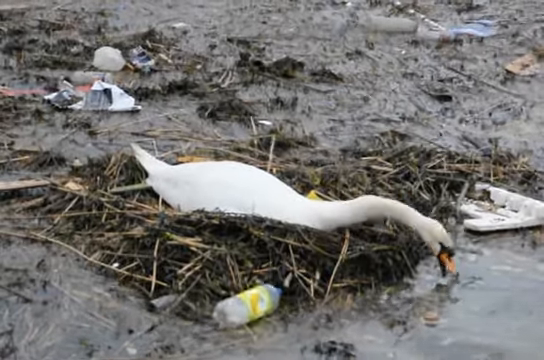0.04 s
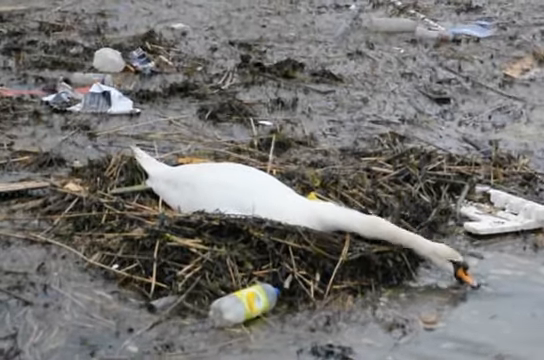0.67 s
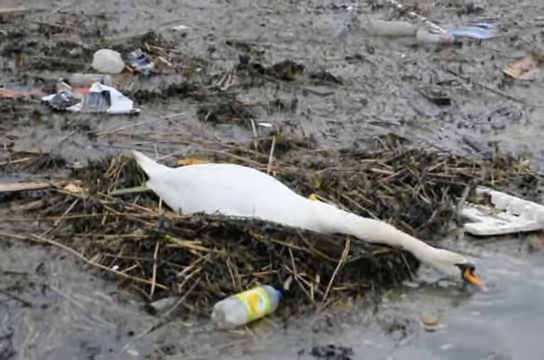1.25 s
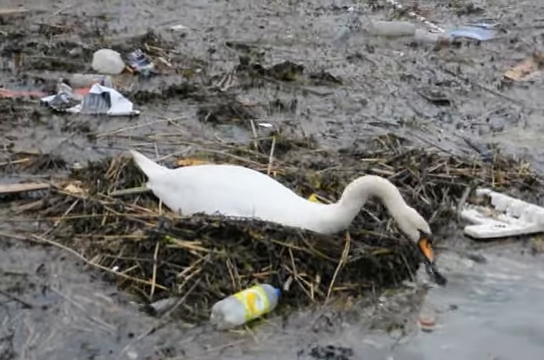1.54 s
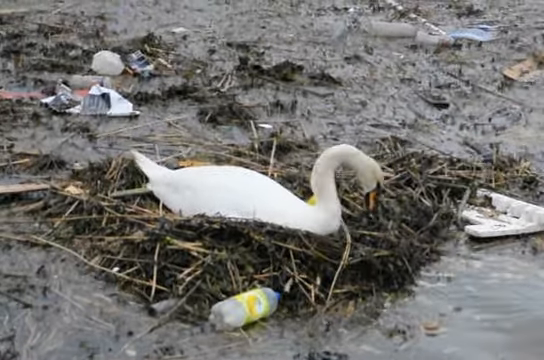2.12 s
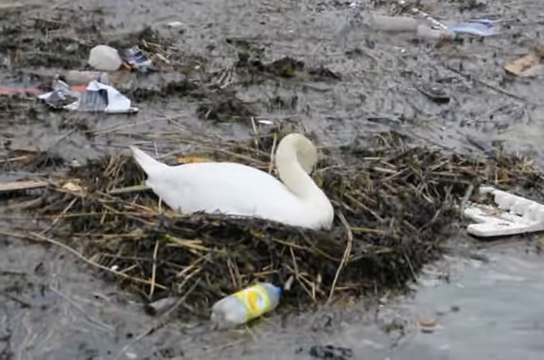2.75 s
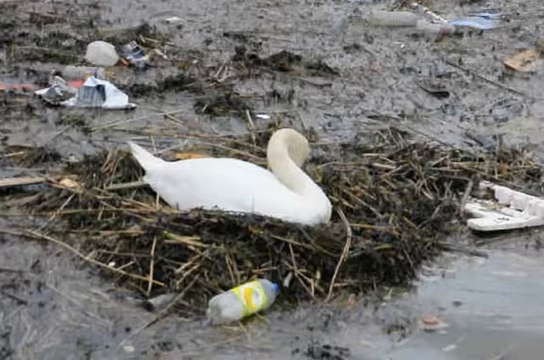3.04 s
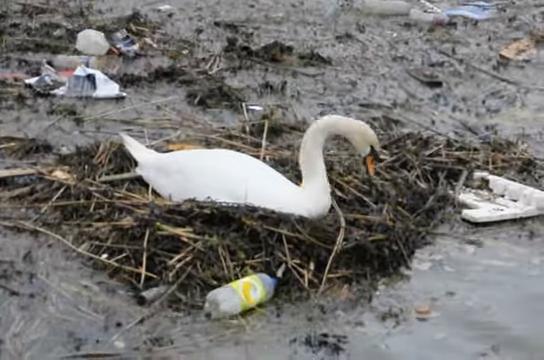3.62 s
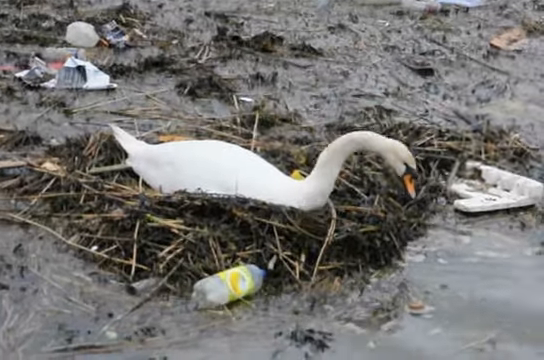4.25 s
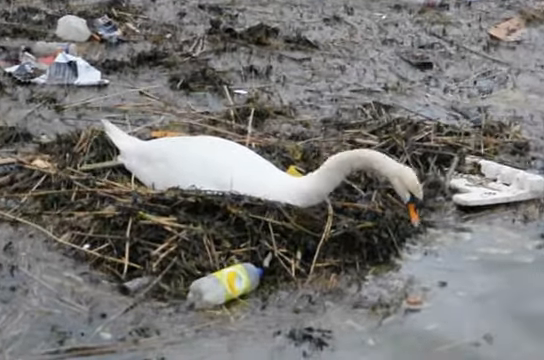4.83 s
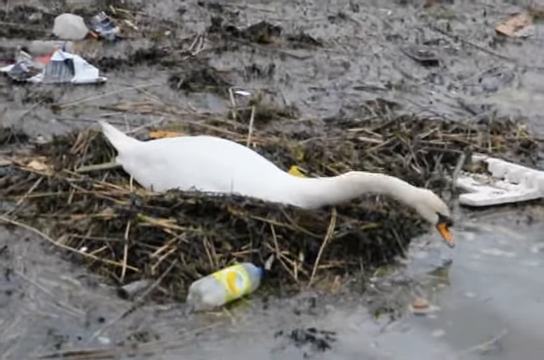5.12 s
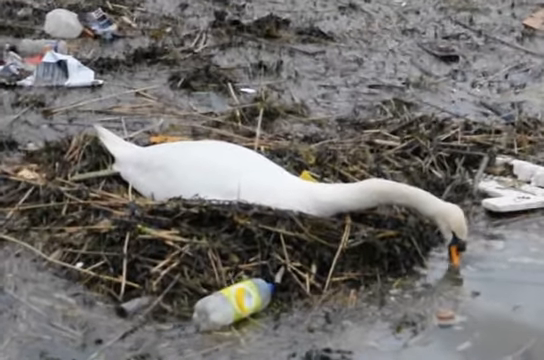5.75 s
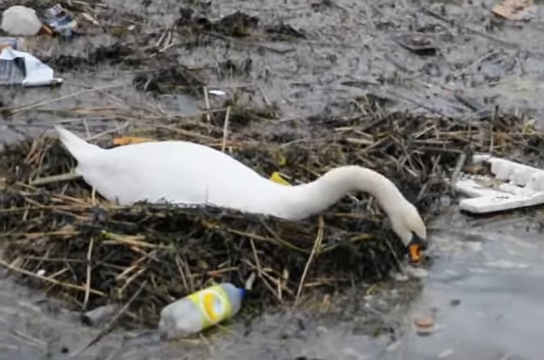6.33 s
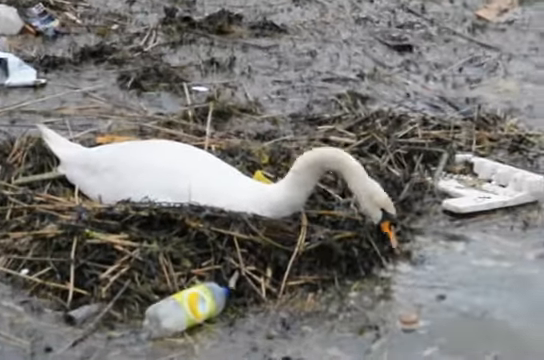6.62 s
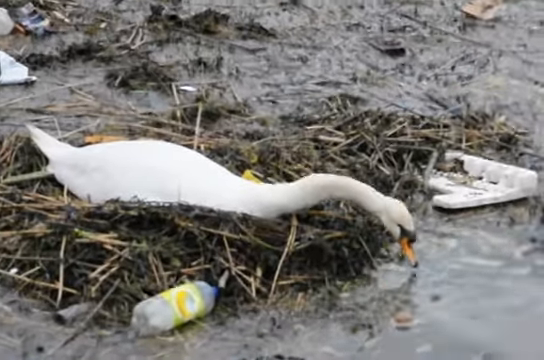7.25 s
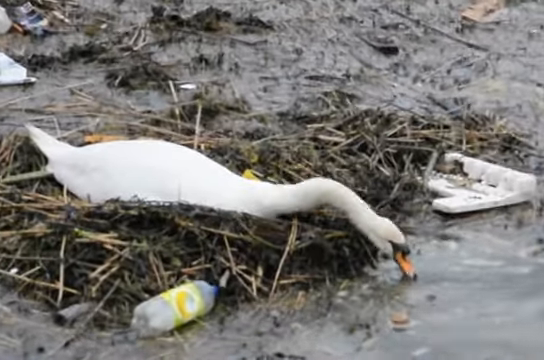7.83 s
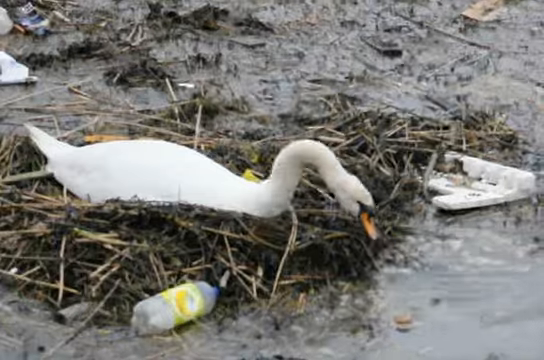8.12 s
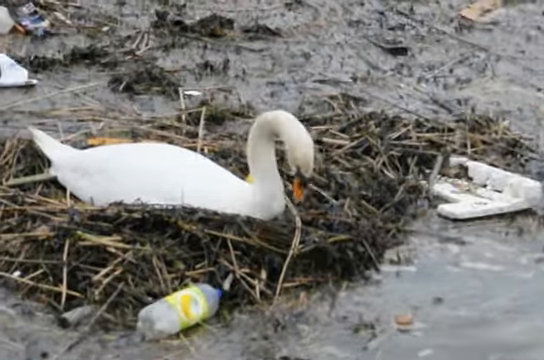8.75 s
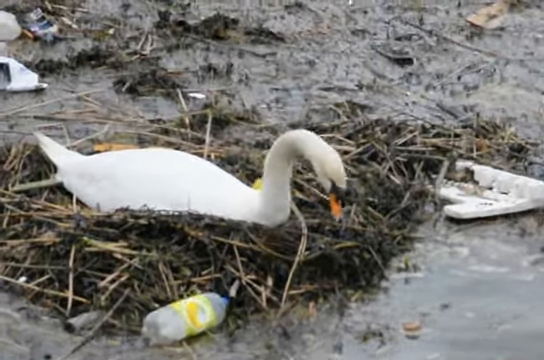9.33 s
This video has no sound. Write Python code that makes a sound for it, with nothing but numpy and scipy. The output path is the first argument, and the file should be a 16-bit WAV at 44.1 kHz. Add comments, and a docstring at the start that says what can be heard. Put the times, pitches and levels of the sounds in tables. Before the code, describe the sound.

An even, low wash of distant traffic runs throughout, heard from a muddy riverbank. A dabbling swan makes faint wet ticks at about 0.5 seconds and between 1.5 and 2 seconds, then three clearer ones between 5 and 5.7 seconds. Meanwhile a single car gradually approaches, its tyres roaring and hissing with a narrow singing tone above a faint engine hum. A small bird gives one thin, quiet peep near 3.9 seconds, and the tyres knock lightly over two seams at about 4.2 and 4.5 seconds. The car is loudest from roughly 6 to 8.5 seconds; its hum drops slightly in pitch as it passes, and the hiss then falls away. From about 7.7 seconds, gusts buffet the microphone with a low flutter and irregular thumps, strongest around 9 seconds and lasting until the end at about 9.5 seconds.

```python
"""A wash of far traffic lies over a muddy riverbank, and out of it one car draws near, passes and recedes.
Its tyres roar, hiss and sing on the asphalt above a faint engine hum that falls by the Doppler effect.
Early on, a swan dabbling at its nest makes small wet ticks; a small bird peeps once, and the tyres
knock over two seams. Towards the end, turbulent gusts buffet the microphone."""
import sys
import numpy as np
from scipy import signal
from scipy.fft import rfft, irfft, next_fast_len
from scipy.io import wavfile
from scipy.ndimage import uniform_filter1d, map_coordinates

SR = 44100
rng = np.random.default_rng(int(sys.argv[2]) if len(sys.argv) > 2 else 0)


def to_wav(s):
    """Save 16-bit WAV."""
    ch = np.atleast_2d(s).T  # columns
    pcm = np.round(np.clip(ch, -1, 1) * 32767)  # PCM
    wavfile.write(sys.argv[1], SR, pcm.astype(np.int16))


N = 418068
TIME = np.arange(N) / SR


def amp(db):
    """Amplitude ratio of a level in decibels."""
    return 10 ** (np.asarray(db) / 20)

def unit(x):
    """Normalisation to rms 1."""
    return x / np.sqrt(np.mean(x ** 2) + 1e-20)

def curve(rows):
    """Linear interpolation of (t, value) rows at every sample."""
    return np.interp(TIME, *np.transpose(rows))

def step(at_s, width_s):
    """A smooth transition from 0 to 1 around at_s."""
    return (1 + np.tanh((TIME - at_s) / width_s)) / 2

def wobble(rate):
    """Random modulation: a spline through rate knots a second."""
    knots = rng.standard_normal(int(N * rate / SR) + 4)
    return map_coordinates(knots, [TIME * rate])

def filtered(x, response):
    """Linear filtering: the spectrum of x times a frequency response."""
    size = next_fast_len(len(x) + 8192)
    return irfft(rfft(x, size) * response(np.fft.rfftfreq(size, 1 / SR)), size)[:len(x)]

def coloured(x, spectrum):
    """Spectral shaping by (f/Hz, level/dB) points on a log frequency axis."""
    f, db = np.transpose(spectrum)
    return filtered(x, lambda hz: amp(np.interp(np.log(hz + 1), np.log(f), db)))

def rush(spectrum, patchy_db):
    """Scintillation: noise of rms 1 with drifting patches of gain, as after crossing moving air."""
    spectrogram = signal.stft(rng.standard_normal(N), nperseg=1024)[2]
    patches = uniform_filter1d(rng.standard_normal(spectrogram.shape), size=7, axis=0)
    patches = unit(uniform_filter1d(patches, size=12, axis=1))
    noise = signal.istft(spectrogram * amp(patchy_db * patches), nperseg=1024)[1][:N]
    return unit(coloured(noise, spectrum))

def bursts(noise, rows):
    """Gaussian windowing: one burst of noise for each (t/s, level/dB, length/s)."""
    out = np.zeros(N)
    for at_s, db, length in rows:
        near = np.abs(TIME - at_s) < 2 * length
        window = np.exp(-2 * ((TIME[near] - at_s) / length) ** 2)
        puff = window * noise[near]
        out[near] += amp(db) * puff * np.linalg.norm(window) / np.linalg.norm(puff)
    return out


# Spectrum of distant roads: f/Hz, level/dB
TRAFFIC_SPECTRUM = [(20, -29.5), (62, -5.5), (100, -8.5), (160, -6), (270, -0.5), (360, -2), (620, -0.5),
                    (1000, -6.5), (1600, -10.5), (2400, -23.5), (3200, -28.5), (4500, -34), (5600, -45),
                    (7000, -57)]

def far_traffic():
    """Incoherent addition: distant roads merge into an even wash of noise."""
    return amp(-36.5 + 0.46 * wobble(3)) * rush(TRAFFIC_SPECTRUM, patchy_db=0.5)


PASS_S, ROAD_M, SPEED_M_PER_S, SOUND_M_PER_S = 7.7, 16.64, 11.96, 343

def distance():
    """Uniform motion on a straight road: metres to the car, least at PASS_S."""
    return np.hypot(ROAD_M, SPEED_M_PER_S * (TIME - PASS_S))

def passing(near_db, doubling_db, coming_db, going_db):
    """Gain under a loss per doubling of distance and screening before and after an open stretch."""
    screened_db = coming_db * (1 - step(5.85, width_s=0.24)) + going_db * step(8.39, width_s=0.09)
    return amp(near_db - doubling_db * np.log2(distance() / ROAD_M) - screened_db)


# Spectra of the parts of the tyre noise: f/Hz, level/dB
ROAR_COMING_SPECTRUM = [(300, -34.5), (570, -17.5), (700, -4), (930, -2.5), (1080, -3.5), (1270, -8.5),
                        (1520, -6.5), (1950, -10.5), (2500, -21), (3500, -37.5), (6000, -67)]
ROAR_GOING_SPECTRUM = [(300, -16.5), (520, -8), (780, -7), (950, 0.5), (1200, -4.5), (1500, -9),
                       (1950, -14.5), (2500, -21), (3500, -33), (6000, -63.5)]
HISS_SPECTRUM = [(900, -20.5), (2000, 7.5), (2700, 3.5), (3900, -2.5), (4700, -9), (5500, -20), (6200, -26),
                 (7200, -39)]
SIZZLE_SPECTRUM = [(2800, -30.5), (3700, 1), (4500, 1.5), (5500, -9.5), (6300, -14), (7200, -22.5)]
DRONE_SPECTRUM = [(25, -40), (70, -21), (120, -14.5), (200, -5), (280, 1), (365, -6), (460, -1.5),
                  (570, -9.5), (800, -8.5), (1500, -64.5)]
# Brief swells and dips of the tyre noise: t/s, half width/s, gain/dB
TYRE_SWELLS = [(4.95, 0.23, 1), (6.08, 0.51, 2), (7.36, 0.08, 0.9), (8.14, 0.1, -1.5), (8.4, 0.29, 3.5),
               (8.86, 0.096, 3.5)]

def tyres():
    """Rolling noise: roar, hiss, drone and, close by, sizzle; the roar changes colour in passing."""
    gone = step(8.04, width_s=0.31)
    roar = np.sqrt(1 - gone) * rush(ROAR_COMING_SPECTRUM, patchy_db=0.5)
    roar += np.sqrt(gone) * rush(ROAR_GOING_SPECTRUM, patchy_db=2.5)
    roar *= passing(near_db=-15.5, doubling_db=13, coming_db=-0.5, going_db=3.5)
    hiss = rush(HISS_SPECTRUM, patchy_db=0.95)
    hiss *= passing(near_db=-27, doubling_db=13, coming_db=4, going_db=11.5)
    sizzle = rush(SIZZLE_SPECTRUM, patchy_db=2.1)
    sizzle *= passing(near_db=-42.5, doubling_db=21.5, coming_db=2.5, going_db=10)
    drone = rush(DRONE_SPECTRUM, patchy_db=0.6)
    drone *= passing(near_db=-26.5, doubling_db=11, coming_db=0, going_db=-4)
    swell_db = sum(db * np.exp(-((TIME - at_s) / width) ** 2) for at_s, width, db in TYRE_SWELLS)
    road_db = 0.46 * wobble(14)  # uneven asphalt shakes all parts together
    return amp(road_db) * (amp(swell_db) * (roar + hiss + sizzle) + drone)


# Strength of the tread's song on the changing asphalt: t/s, gain/dB
SONG_GAIN = [(0, -15), (3.1, -3), (3.5, 2), (4.1, 2), (4.7, -2.5), (5.5, 1.5), (7.3, -2.5), (8.7, 4),
             (9.48, -1.5)]

def tread_song(centre_hz=921, half_width_hz=65):
    """Resonance: air in the tread grooves sings in one narrow band."""
    groove = filtered(rng.standard_normal(N), lambda hz: 1 / (1 + ((hz - centre_hz) / half_width_hz) ** 2))
    gain = passing(near_db=-27.5, doubling_db=5.5, coming_db=2.5, going_db=3)
    return gain * amp(curve(SONG_GAIN)) * unit(groove)


# Engine harmonics: multiple of the firing rate, relative level/dB
ENGINE_ORDERS = [(1, -10), (2, -2), (3, 2.5)]
# Envelope of the hum: t/s, level/dB
HUM_LEVEL = [(0, -62), (4.2, -58), (4.6, -44), (5.3, -58.5), (6.1, -44.5), (6.7, -45), (7.1, -56),
             (9.48, -55.5)]

def engine(firing_hz=60.9):
    """Doppler effect: the slightly unsteady firing harmonics drop in pitch as the car goes by."""
    doppler = 1 - np.gradient(distance()) * SR / SOUND_M_PER_S
    rate_hz = firing_hz * doppler * (1 + 0.008 * wobble(9))
    phase = 2 * np.pi * np.cumsum(rate_hz) / SR
    hum = sum(amp(db + 2.9 * wobble(4)) * np.sin(order * phase) for order, db in ENGINE_ORDERS)
    return amp(curve(HUM_LEVEL)) * unit(hum)


# Wet ticks of the swan's bill: t/s, peak level/dB
BILL_TICKS = [(0.5382, -34), (.55, -43), (1.49, -45), (1.503, -44), (1.517, -40), (1.53, -45), (1.73, -39),
              (1.77, -47), (2.016, -44), (4.9877, -29), (5.1486, -26.5), (5.7262, -29)]
# Spectrum of a splash: f/Hz, level/dB
SPLASH_SPECTRUM = [(800, -31), (2200, -8), (3300, -2), (4700, 0), (5800, -9.5), (6500, -16), (7200, -42)]

def swan(spray_db=-30, spray_t60_s=0.08, droplets_per_sample=0.03):
    """Impulsive excitation: each tick is one snap of water, then a faint spatter of droplets."""
    snaps = np.zeros(N)
    t = np.arange(SR // 10) / SR
    for at_s, db in BILL_TICKS:
        droplets = unit(rng.standard_normal(len(t)) * (rng.random(len(t)) < droplets_per_sample))
        spray = droplets * amp(spray_db - 60 * t / spray_t60_s)
        snaps[round(at_s * SR):][:len(t)] += amp(db) * ((t == 0) + spray)
    wet = coloured(snaps, SPLASH_SPECTRUM)
    return wet * np.abs(snaps).max() / np.abs(wet).max()


def bird(at_s=3.922, pitch_hz=4220, attack_s=0.01, t60_s=0.22, db=-48):
    """Reverberant decay: one thin peep, whose pitch jitter and tail stand for echoes from the bank."""
    t = np.maximum(TIME - at_s, 0)
    phase = 2 * np.pi * np.cumsum(pitch_hz * (1 + 0.014 * wobble(400))) / SR
    return amp(db - 60 * t / t60_s) * (1 - np.exp(-t / attack_s)) * np.sin(phase)


# Knocks at seams in the asphalt: t/s, level/dB, length/s
SEAM_KNOCKS = [(4.166, -27, 0.0048), (4.523, -36, 0.0035)]

def seams():
    """Impact noise: the tyres clip seams, giving short knocks with the colour of their roar."""
    return bursts(rush(ROAR_COMING_SPECTRUM, patchy_db=-4.0), SEAM_KNOCKS)


# Gusts at the microphone: onset t/s, length/s, level/dB
WIND_GUSTS = [(5.474, .06, -41), (7.663, 2.2, -28.5), (8.402, 0.22, -23), (8.94, .06, -18.5),
              (9.062, 0.31, -21.5)]
# Thumps of the strongest eddies: t/s, level/dB, length/s
EDDY_THUMPS = [(7.725, -17, 0.01), (7.987, -14.5, 0.0073), (8.049, -18, 0.029), (8.417, -15.5, 0.014),
               (8.586, -14, 0.01), (8.649, -9.5, 0.0063), (8.696, -10, 0.01), (8.916, -10.5, 0.011),
               (8.985, -7.5, 0.01), (9.078, -9.5, 0.01), (9.161, -10, .016), (9.207, -12.5, 0.0059),
               (9.276, -12, 0.0086), (9.34, -13.5, 0.018)]
# Spectra of the low buffeting and of an eddy's brighter slap: f/Hz, level/dB
BUFFET_SPECTRUM = [(15, -17), (35, -14), (70, -6), (130, 0), (220, 0.5), (320, -2.5), (430, -10.5),
                   (700, -21), (1400, -37.5), (3000, -52), (7000, -92)]
SLAP_SPECTRUM = [(100, -12), (400, -0.5), (800, 5), (1500, -18), (3000, -36), (7000, -75.5)]

def wind(attack_s=0.0098, release_s=0.033, breeze_db=-67, slap_s=0.0035, slap_gain_db=-8):
    """Turbulent pressure: gusts flutter on the microphone, and strong eddies thump and slap it."""
    flow = sum(amp(db) * step(onset, attack_s) * (1 - step(onset + length, release_s))
               for onset, length, db in WIND_GUSTS)
    turbulence = unit(amp(3.5 * wobble(55)) * rush(BUFFET_SPECTRUM, patchy_db=1.5))
    flutter = (amp(breeze_db) + flow) * turbulence
    thumps = bursts(rush(BUFFET_SPECTRUM, patchy_db=-2.0), EDDY_THUMPS)
    slap_rows = [(at_s, db + slap_gain_db, slap_s) for at_s, db, _ in EDDY_THUMPS]
    slaps = bursts(rush(SLAP_SPECTRUM, patchy_db=-1.5), slap_rows)
    return flutter + thumps + slaps


def scene():
    """Superposition: road, riverbank and wind add at one microphone."""
    car = tyres() + tread_song() + seams() + engine()
    return (far_traffic() + car + wind() + swan() + bird())[None]


# Treble response of the microphone: f/Hz, gain/dB
MICROPHONE_RESPONSE = [(4800, 0), (5200, 0), (5500, -1), (5900, 0), (6400, -2.5), (6750, -7), (7000, -14),
                       (7300, -26)]

def record(dry, ceiling=0.95, top_hz=7300):
    """Saturation and band limiting: the microphone rounds the strongest gusts and loses the treble."""
    rounded = dry / (1 + np.abs(dry / ceiling) ** 10) ** (1 / 10)
    dulled = [coloured(channel, MICROPHONE_RESPONSE) for channel in rounded]
    return np.array([filtered(channel, lambda hz: hz < top_hz) for channel in dulled])


dry = scene()
out = record(dry)
to_wav(out)
```